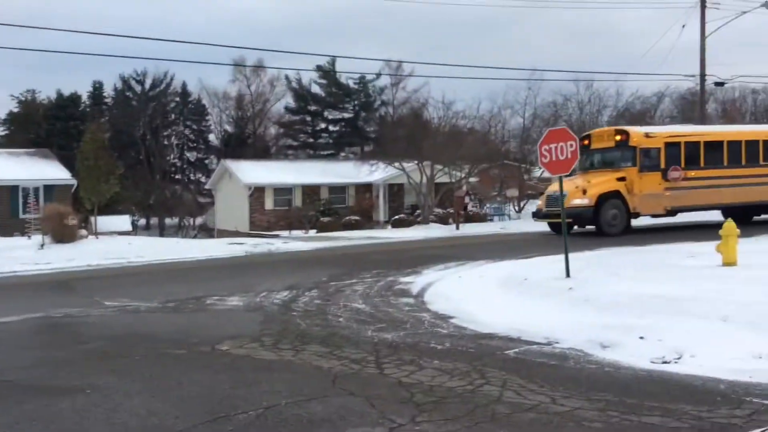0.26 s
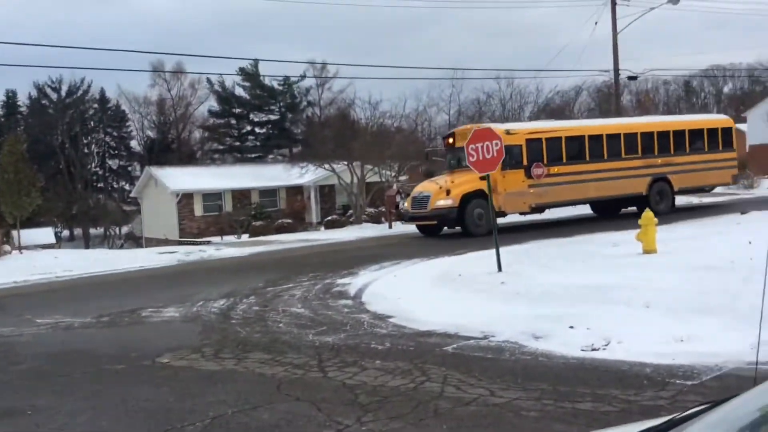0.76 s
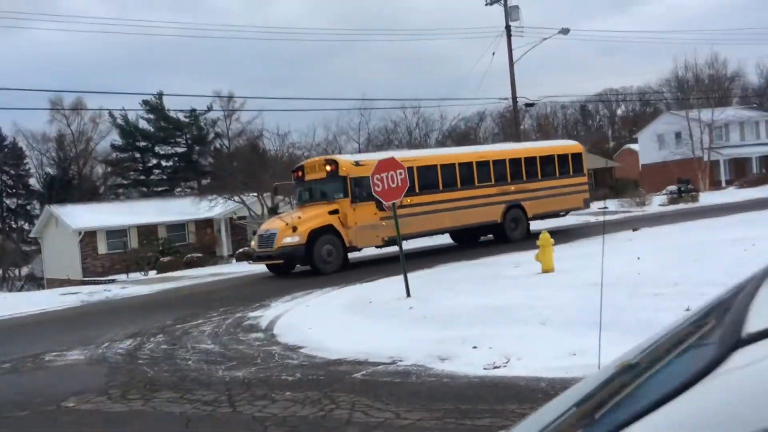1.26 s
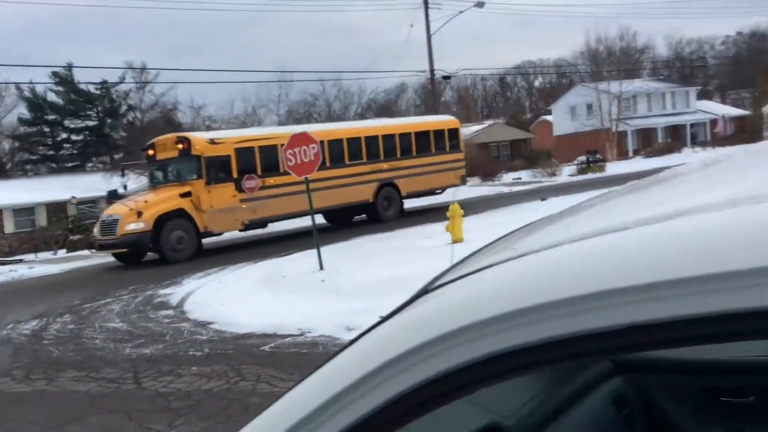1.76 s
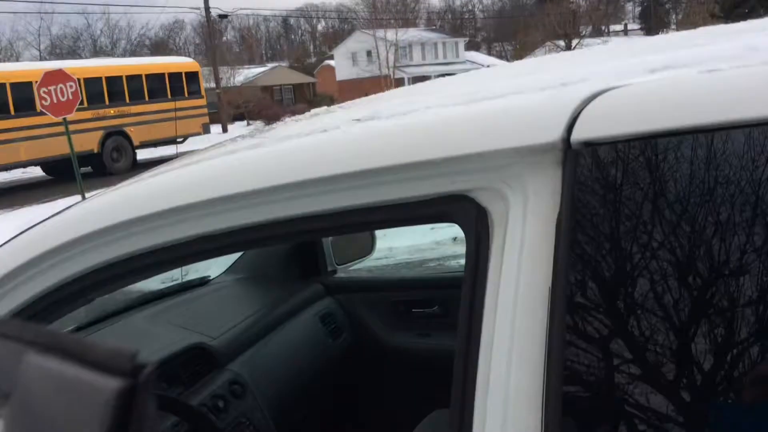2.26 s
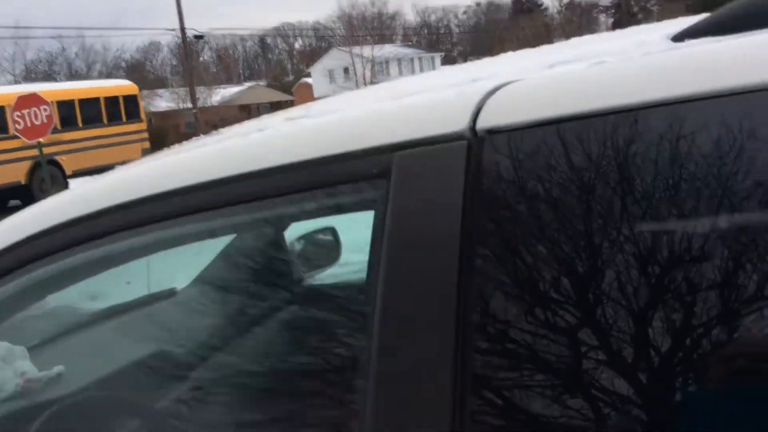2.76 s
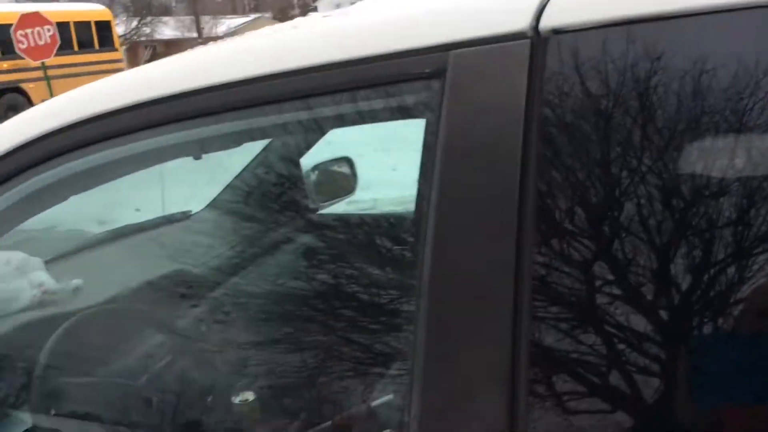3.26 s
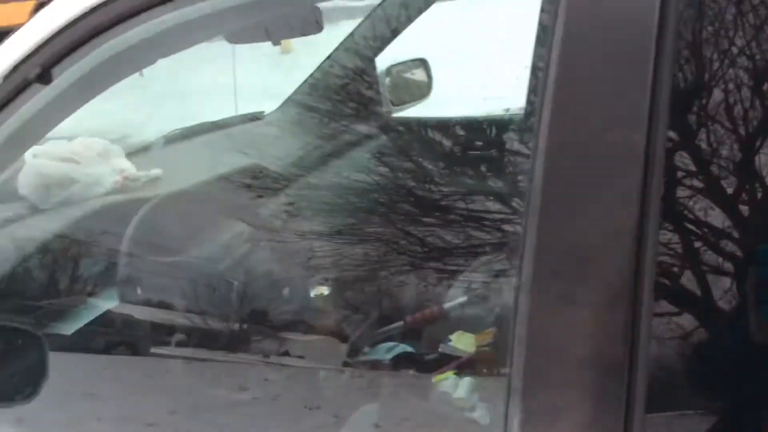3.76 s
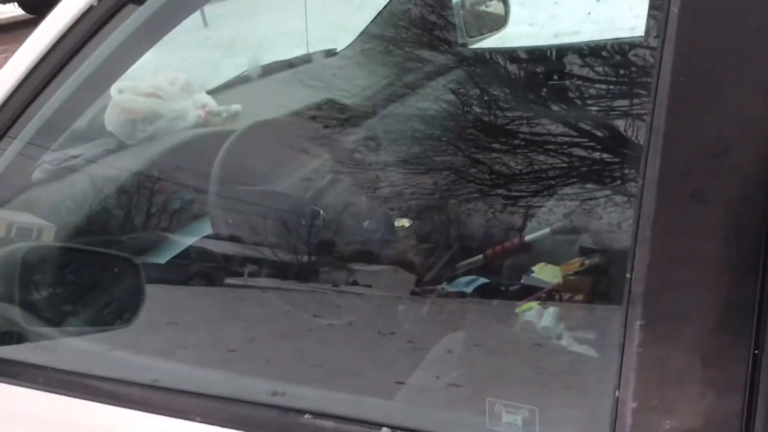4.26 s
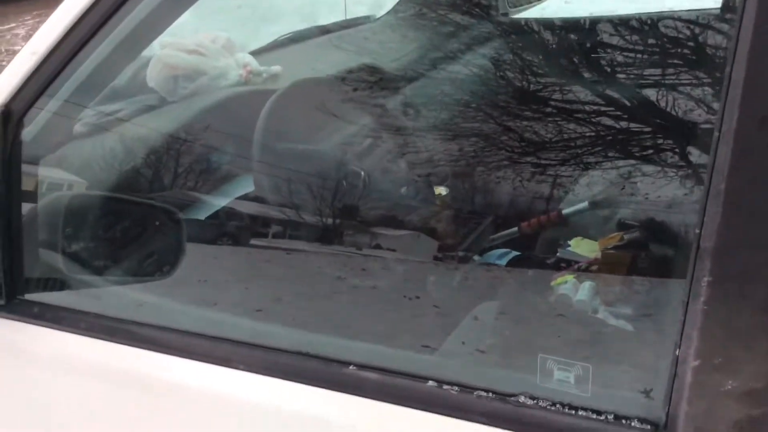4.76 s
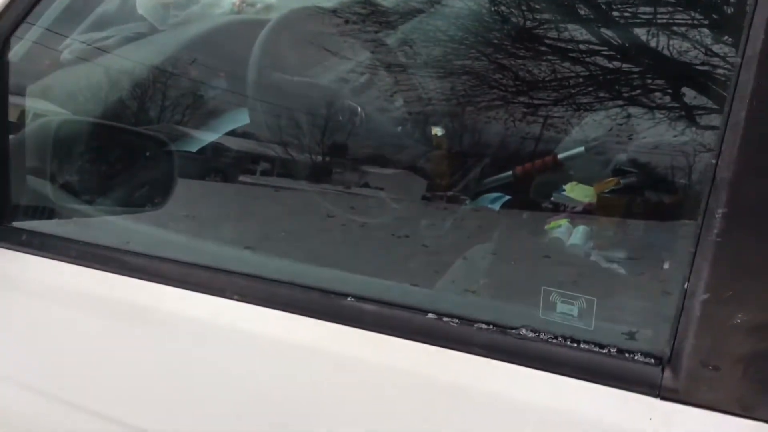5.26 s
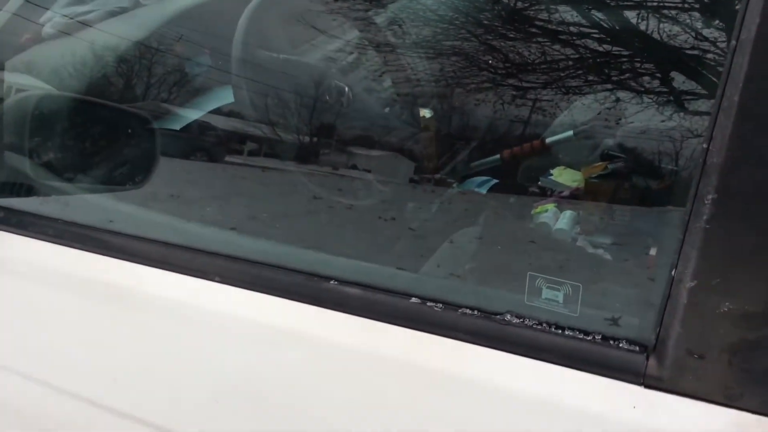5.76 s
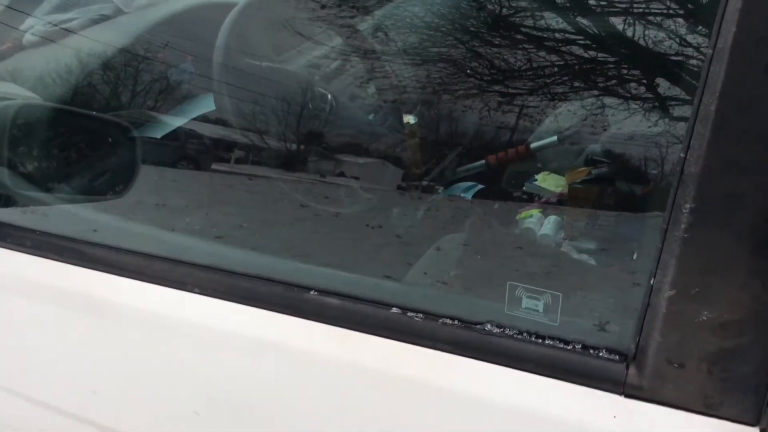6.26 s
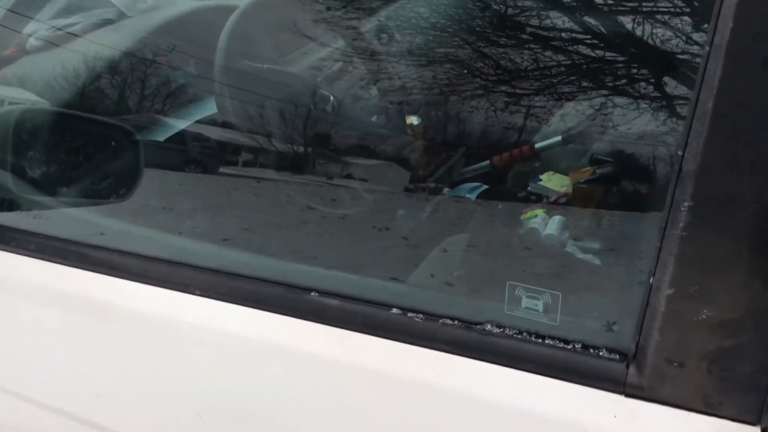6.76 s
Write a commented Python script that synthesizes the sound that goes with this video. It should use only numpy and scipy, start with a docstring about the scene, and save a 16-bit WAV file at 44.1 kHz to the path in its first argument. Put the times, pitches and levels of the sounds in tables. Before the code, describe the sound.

Close handling bumps and rubbing interrupt a steady idling car, with faint, high brake squeals from a slowing bus.

```python
"""A car engine idles beside a hand-held phone on a snowy street, humming and rumbling throughout.
From the start, a bus further off drones and rattles as it slows; its brakes stick and slip in high
squeals until just after 5 s. From about 2 s the hand shifts its grip: fingers knock, rub and thump on
the phone case, hardest near 3 s and again near 4.6 s and 6 s. Just before the end the grip squeaks."""
import sys
import numpy as np
from scipy import signal
from scipy.fft import rfft, irfft, next_fast_len
from scipy.io import wavfile
from scipy.ndimage import uniform_filter1d, map_coordinates

SR = 44100
rng = np.random.default_rng(int(sys.argv[2]) if len(sys.argv) > 2 else 0)


def materialize(psi):
    """Save the field psi as 16-bit PCM at rate SR to the path in sys.argv[1].

    A 1-D psi becomes a single channel; in a 2-D psi each row is a channel.
    """
    bounded = np.clip(np.atleast_2d(psi).T, -1, 1)
    quanta = np.round(bounded * 32767).astype(np.int16)
    wavfile.write(sys.argv[1], SR, quanta)


N = 308700  # 7 seconds
T = np.arange(N) / SR


def amp(db):
    """Turn decibels into a number to multiply a sound by."""
    return 10 ** (np.asarray(db) / 20)


def unit(x):
    """Scale a sound to an average strength (rms) of 1."""
    return x / np.sqrt(np.mean(x ** 2) + 1e-20)


def curves(rows):
    """Join a table's points over time: one curve for each column after the first."""
    times, *columns = np.transpose(rows)
    return [np.interp(T, times, column) for column in columns]


def wobble(rate):
    """A smooth curve through `rate` random values a second."""
    return map_coordinates(rng.standard_normal(int(N * rate / SR) + 4), [T * rate])


def tone(hz):
    """A pure tone of strength 1 that follows a pitch curve."""
    return np.sqrt(2) * np.sin(2 * np.pi * np.cumsum(hz) / SR)


def noise(spectrum, patchy_db):
    """Noise of strength 1, shaped by a spectrum, with random louder and softer patches."""
    grid = signal.stft(rng.standard_normal(next_fast_len(N + SR // 20)), nperseg=512)[2]
    patches = uniform_filter1d(rng.standard_normal(grid.shape), size=5, axis=0)  # smooth across pitch
    patches = uniform_filter1d(patches, size=9, axis=1)  # and across time
    patchy = signal.istft(grid * amp(patchy_db * unit(patches)), nperseg=512)[1]
    points_hz, points_db = np.transpose(spectrum)
    hz = np.fft.rfftfreq(len(patchy), 1 / SR)
    shape_db = np.interp(np.log(hz + 1), np.log(points_hz + 1), points_db, -120, -120)
    return unit(irfft(rfft(patchy) * amp(shape_db), len(patchy))[:N])


def swells(times, db, rise_s, fall_s, order=1):
    """A volume curve that follows the loudest of several swells: order 1 is pointed, 2 is rounded."""
    level_db = np.full(N, -200.)
    for peak, top_db, rise, fall in zip(times, db, rise_s, fall_s):
        span = slice(max(round((peak - 3 * rise) * SR), 0), round((peak + 3 * fall) * SR))
        from_peak = np.maximum((peak - T[span]) / rise, (T[span] - peak) / fall)
        level_db[span] = np.maximum(level_db[span], top_db - 20 * from_peak ** order)
    return amp(level_db)


def car_engine(firing_hz=72.114, flutter_hz=22.0, flutter_db=0.4):
    """The engine's firing makes a slightly unsteady hum, over rumble, rush, fizz and far hiss."""
    # loudness of the hum: (time [s], level [dB])
    hum_levels = [(0, -36), (2, -37), (3.5, -35.5), (4.5, -35.5), (6.3, -35), (7, -36)]
    # loudness of the background: (time [s], engine rush [dB], fizz [dB])
    background_levels = [(0, -56.5, -77), (.38, -58.5, -77.5), (.77, -54.5, -79.5), (1.5, -59, -77.5),
                         (2.06, -58.5, -79), (2.37, -53.5, -77), (2.75, -57.5, -75.5), (3.6, -58.5, -77),
                         (4.65, -57, -75), (5.12, -57.5, -73), (5.75, -57, -76), (6.59, -57.5, -77.5),
                         (7, -56, -75.5)]
    # tone colour of each noise, lowest first: (frequency [Hz], relative level [dB])
    deep_spectrum = [(20, -29), (30, -17), (45, 2), (60, -8), (85, 8), (110, -37)]
    rumble_spectrum = [(50, -38.5), (85, -21), (94, -6), (97, -9), (151, -10), (255, -19), (344, -31.5),
                       (645, -31), (800, -39.5), (1040, -72), (1760, -120)]
    rush_spectrum = [(470, -42), (800, -27.5), (828, -20.5), (927, -2.5), (1010, -0.5), (1220, 4),
                     (1300, 0), (1500, -10.5), (1950, -42), (3300, -120)]
    fizz_spectrum = [(2100, -29), (2300, -1.5), (2750, 1), (3150, -6.5), (3400, -4.5), (3800, -9),
                     (4300, -28)]
    hiss_spectrum = [(3000, -5.5), (3700, -0.5), (4600, -2.5), (6000, -5.5), (8000, -1), (10000, -5),
                     (11500, -9.5), (13000, -11.5), (15400, -21)]
    hum_db, = curves(hum_levels)
    rush_db, fizz_db = curves(background_levels)
    hum = amp(hum_db + .5 * wobble(6)) * tone(firing_hz + 0.22 * wobble(6.8))
    rumble = noise(rumble_spectrum, patchy_db=0) + amp(-1.5) * noise(deep_spectrum, patchy_db=1.5)
    rumble *= amp(-46 + 1.64 * wobble(7))
    rush_db += flutter_db * np.sin(2 * np.pi * flutter_hz * T)  # a faint, quick flutter in loudness
    rush = amp(rush_db + 0.47 * wobble(9)) * noise(rush_spectrum, patchy_db=1)
    fizz = amp(fizz_db + .6 * wobble(11)) * noise(fizz_spectrum, patchy_db=2)
    hiss = amp(-77.5) * noise(hiss_spectrum, patchy_db=2.1)
    return hum + rumble + rush + fizz + hiss


def bus(rest_hz=40.6, drop_hz=4.5, slowing_s=1.5, fade_db_per_s=1.18):
    """The bus's low drone sinks in pitch as it slows, and its rattle fades as it draws away."""
    # loudness of the drone: (time [s], level [dB])
    drone_levels = [(0, -48), (1, -51), (2.3, -69), (3.5, -47), (5, -56), (7, -58)]
    # tone colour of the rattle: (frequency [Hz], relative level [dB])
    rattle_spectrum = [(1350, -29), (1500, -1), (1600, -3.5), (1800, -0.5), (2050, -6.5), (2250, -14),
                       (2500, -37)]
    drone_db, = curves(drone_levels)
    drone_hz = rest_hz + drop_hz * np.exp(-T / slowing_s) + .7 * wobble(3.9)
    drone = amp(drone_db + 2.5 * wobble(4)) * tone(drone_hz)
    rattle_db = -64 - fade_db_per_s * T + 0.53 * wobble(22) + .8 * wobble(2.5)
    return drone + amp(rattle_db) * noise(rattle_spectrum, patchy_db=1)


def brakes(waver_hz=70, settle_s=1.6):
    """The brakes stick and slip, so each of their natural tones wavers and glides between squeals."""
    # squeals: (peak time [s], pitch [Hz], level [dB], time to rise 20 dB [s], time to fall 20 dB [s])
    squeals = [(0.04, 7990, -79, .1, .15), (0.17, 8150, -85, .08, .06), (0.31, 9150, -77, .07, .1),
               (0.5, 7630, -76, .07, .4), (0.9, 7600, -76, .2, .12), (0.98, 9080, -77, .06, .25),
               (0.99, 4580, -86, .05, .13), (1.29, 7616, -74, .2, .15), (1.45, 7600, -78, .2, .25),
               (1.636, 7589, -70, .07, .07), (1.75, 9060, -72, .05, .28), (1.82, 7570, -72, .1, .13),
               (1.855, 4520, -80, .06, .05), (2.08, 4500, -79, .025, .08), (2.12, 7620, -72, .15, .17),
               (2.18, 9040, -70, .17, .13), (2.214, 4540, -84, .07, .1), (2.27, 7940, -78, .1, .05),
               (2.32, 7810, -76, .03, .06), (2.436, 7754, -71, .06, .12), (2.49, 11800, -83, .03, .12),
               (2.6, 12130, -86, .12, .07), (2.55, 8700, -86, .08, .15), (2.7, 9240, -65, .065, .14),
               (2.745, 8084, -80, .07, .12), (2.75, 5050, -83, .03, .08), (2.81, 9254, -69, .12, .055),
               (2.83, 8099, -80, .1, .06), (2.92, 8400, -77, .035, .07), (2.94, 12110, -87, .06, .25),
               (3.11, 8160, -80, .05, .08), (3.14, 9330, -76, .05, .06), (3.165, 8360, -72, .04, .07),
               (3.31, 5050, -81, .07, .17), (3.346, 8099, -74, .19, .2), (3.355, 8620, -77, .05, .08),
               (3.41, 9210, -66, .18, .14), (3.42, 4614, -81, .1, .1), (3.436, 6529, -75, .1, .1),
               (3.765, 11830, -77, .09, .13), (3.765, 7535, -69, .05, .06), (3.82, 4690, -82, .05, .04),
               (4.04, 12080, -84, .2, .1), (4.08, 6670, -83, .04, .3), (4.09, 9270, -69, .08, .09),
               (4.3, 9230, -74, .2, .35), (4.34, 5648, -85, .05, .1), (4.392, 8625, -73, .17, .13),
               (4.45, 6590, -88, .08, .2), (4.646, 6520, -85, .07, .3), (4.7, 8430, -71, .07, .2),
               (4.73, 9110, -67, .3, .25), (4.97, 8600, -82, .25, .25), (5.12, 9220, -80, .3, .17)]
    # the tones the brakes naturally ring at: (pitch [Hz])
    natural_hz = np.array([4570, 5060, 5650, 6560, 7620, 8090, 8540, 9180, 12000])
    squeals = np.array(squeals)
    nearest_tone = np.abs(squeals[:, 1, None] - natural_hz).argmin(axis=1)
    shake = np.exp(-T / settle_s)  # the squeals steady as the bus comes to rest
    out = np.zeros(N)
    for k in np.unique(nearest_tone):
        times, hz, db, rise, fall = squeals[nearest_tone == k].T
        flutter = amp((3.5 + 3 * shake) * wobble(50))
        pitch_hz = np.interp(T, times, hz) + waver_hz * shake * wobble(150)
        out += swells(times, db, rise, fall, order=2) * flutter * tone(pitch_hz)
    return out


def knocks():
    """A finger hits the case with a click, and the case rings briefly with two tones."""
    # knocks: (time [s], ring level [dB], click level [dB], pitch [Hz], time to fade 60 dB [s])
    hits = [(2.207, -36, -46, 695.7, 0.0064), (2.208, -52.5, -71, 7000, 0.017),
            (2.795, -22, -64, 1124, 0.09), (2.809, -11, -58, 1129, 0.049), (2.848, -54, -68, 7200, 0.034),
            (2.992, -0.5, -19, 1325, 0.0058), (3.004, 3.5, -6, 1130, 0.0055),
            (3.0037, -33.5, -50, 6680, 0.0069), (3.018, 2, -31, 600, 0.0069),
            (3.0193, -7, -43, 1120, 0.0094), (3.121, -9, -47, 1286, 0.0088), (3.13, -28, -62, 1250, 0.013),
            (3.151, -18.5, -44, 760, 0.0081), (3.158, -14, -47, 450, 0.012), (3.226, -37, -62, 580, 0.057),
            (3.316, -62, -75, 7200, .02), (3.798, -32, -66, 500.3, 0.0075), (4.562, -21, -64, 505.6, 0.011),
            (4.593, -12, -62, 570, 0.0092), (4.618, -15.5, -60, 384, 0.012),
            (5.966, -35.5, -71, 393, 0.079), (6.085, -37, -70, 586, 0.0352),
            (6.39, -37.5, -68.5, 530, 0.031), (6.532, -37.5, -68, 607, 0.05),
            (6.552, -29.5, -76, 920, 0.016), (6.896, -31, -70.5, 1270, 0.011),
            (6.969, -28, -72, 750, 0.0077)]
    out, t = np.zeros(N + SR), np.arange(SR // 6) / SR
    band = signal.butter(2, [1300, 3600], "bandpass", fs=SR, output="sos")
    for start, ring_db, click_db, hz, fade_s in hits:
        contact = np.sin(np.pi / 2 * np.clip(t * np.sqrt(hz) / 0.019, 0, 1)) ** 2  # duller lands softer
        upper_db = -6 + 0.41 * ring_db - 60 * t / 0.023  # harder knocks bring out the upper tone
        ring = np.sin(2 * np.pi * hz * t) + amp(upper_db) * np.sin(2 * np.pi * (hz + 850) * t)
        ring *= contact * amp(ring_db - 60 * t / fade_s)
        spike = amp(15.5) * (t == 0)
        burst = rng.standard_normal(len(t)) * amp(-4 - 60 * t / 0.011)
        click = signal.sosfilt(band, signal.sosfilt(band, spike + burst))
        out[round(start * SR):][:len(t)] += ring + amp(click_db) * click
    return out[:N]


def rubbing():
    """Skin slips over the case in uneven little jerks."""
    # strokes: (peak time [s], dull [dB], bright [dB], time to rise 20 dB [s], time to fall 20 dB [s])
    strokes = [(2.798, -33, -45, .006, .05), (2.814, -21, -37.5, .025, .06), (2.84, -28.5, -37, .07, .055),
               (2.875, -31, -55, .05, .08), (2.994, -30, -37, .004, .05), (3.035, -32, -49.5, .045, .045),
               (3.05, -38, -42, .045, .035), (3.123, -36, -48, .005, .04), (3.15, -35, -50, .01, .05),
               (3.185, -43, -46, .055, .07), (3.235, -40, -56, .03, .035), (3.28, -41.5, -75, .05, .07),
               (3.313, -52, -57, .03, .07), (3.37, -46.5, -72, .2, .3), (3.42, -47, -60, .09, .07),
               (3.57, -52, -68, .12, .2), (3.632, -28, -47.5, .04, .04), (3.87, -52, -70, .06, .08),
               (4.03, -51.5, -78, .05, .3), (4.09, -50, -70, .3, .08), (4.51, -51, -65, .03, .1),
               (4.565, -36, -66, .014, .03), (4.633, -37.5, -46.5, .08, .055),
               (4.86, -47.5, -55.5, .05, .07), (6.0, -42, -70, .04, .2), (6.048, -31, -65, .04, .05),
               (6.88, -54, -59, .05, .12), (6.95, -51, -65, .3, .1)]
    # the two tone colours of rubbing: (frequency [Hz], relative level [dB])
    dull_spectrum = [(100, -26.5), (200, 3), (380, -0.5), (650, -10.5), (1200, -23), (2500, -62)]
    bright_spectrum = [(500, -37.5), (900, -1.5), (1300, 0.5), (1900, -3), (2600, -20), (3500, -25),
                       (5000, -37.5), (7500, -40), (9500, -69)]
    times, dull_db, bright_db, rise, fall = np.transpose(strokes)
    jerks = amp(1.5 * wobble(90))
    dull = unit(jerks * noise(dull_spectrum, patchy_db=1.5))
    bright = unit(jerks * noise(bright_spectrum, patchy_db=3.5))
    return swells(times, dull_db, rise, fall) * dull + swells(times, bright_db, rise, fall) * bright


def thumps():
    """Soft pushes set the whole phone swinging for a moment."""
    # pushes: (time [s], level [dB], pitch [Hz], time to fade 60 dB [s], direction [+1 or -1], rise [s])
    pushes = [(2.809, -13, 52.6, 0.18, 1, 0.004), (2.815, -4, 107, 0.059, 1, 0.0016),
              (2.8469, -2.5, 122, 0.061, -1, 0.0035), (2.867, -11, 153, 0.025, -1, 0.00077),
              (2.892, -17.5, 80.3, 0.28, -1, 0.0047), (2.998, 0.5, 62, 0.019, -1, 0.00063),
              (3.005, -12, 81, 0.08, 1, 0.00082), (3.0181, 2.5, 103.7, 0.025, -1, 0.00079),
              (3.124, -13, 65, 0.034, -1, 0.00097), (3.16, -7, 115, 0.015, -1, 0.00074),
              (3.2, -21, 108, 0.12, 1, .003), (3.233, -20.5, 113, 0.043, -1, 0.0017),
              (3.2662, -14.5, 113, 0.048, 1, 0.0016), (3.63, -20.5, 323, 0.096, 1, 0.0025),
              (3.635, -10, 176, 0.03, -1, 0.0017), (4.595, -12.5, 102.5, 0.059, -1, 0.001),
              (4.622, -9, 116, 0.03, -1, 0.0017), (6.042, -19, 404, 0.062, 1, 0.002573),
              (6.048, -22.5, 192, 0.097, -1, 0.0018), (6.703, -20, 132, 0.029, 1, 0.0015)]
    out, t = np.zeros(N + SR), np.arange(SR // 3) / SR
    for start, db, hz, fade_s, direction, rise in pushes:
        swing = np.sin(2 * np.pi * hz * t) * (1 - np.exp(-t / rise))
        out[round(start * SR):][:len(t)] += direction * amp(db - 60 * t / fade_s) * swing
    return out[:N]


def grip_squeaks():
    """The grip squeaks on the case: a narrow, hollow-sounding noise swells and fades."""
    # squeaks: (peak time [s], level [dB], time to rise 20 dB [s], time to fall 20 dB [s])
    squeaks = [(6.725, -48, .035, .2), (6.765, -46, .15, .1), (6.835, -46, .025, .06)]
    # their tone colour: (frequency [Hz], relative level [dB])
    hollow_spectrum = [(380, -23), (480, -3), (560, -1.5), (640, -11), (800, -22)]
    return swells(*np.transpose(squeaks)) * noise(hollow_spectrum, patchy_db=3.5)


def scene():
    """All the sounds add up at one microphone."""
    return (car_engine() + bus() + brakes() + knocks() + rubbing() + thumps() + grip_squeaks())[None]


def record(dry):
    """The phone's microphone loses the deepest bass, and the highest treble is cut off."""
    bass_hz, top_hz = 38, 15400
    size = next_fast_len(N + SR // 2)
    hz = np.fft.rfftfreq(size, 1 / SR)
    bass_cut = 1 / np.sqrt(1 + (bass_hz / (hz + 1)) ** 8)
    return irfft(rfft(dry, size) * bass_cut * (hz < top_hz), size)[..., :N]


dry = scene()
out = record(dry)
materialize(out)
```